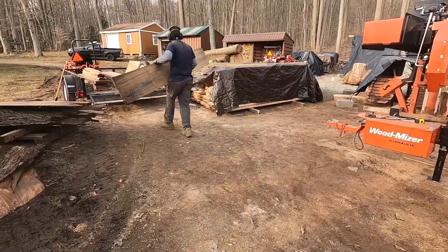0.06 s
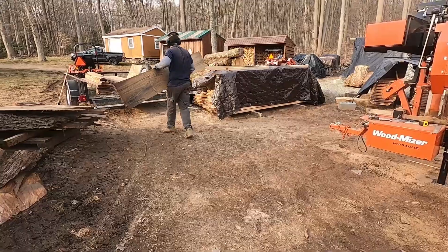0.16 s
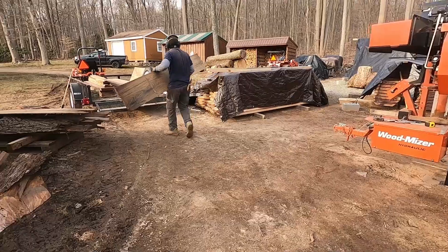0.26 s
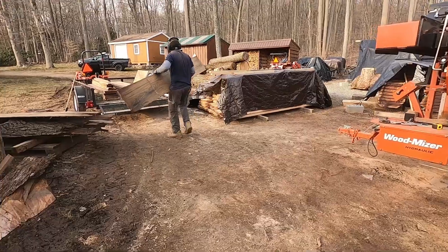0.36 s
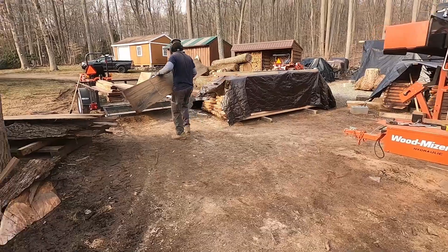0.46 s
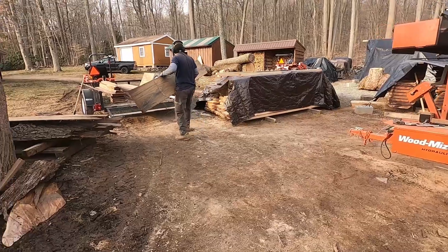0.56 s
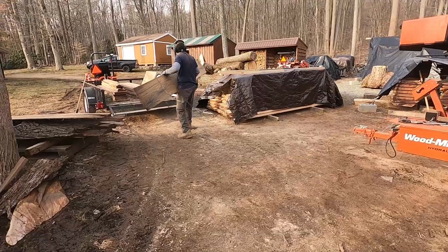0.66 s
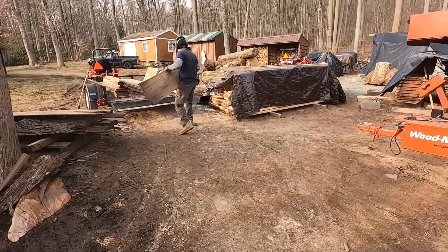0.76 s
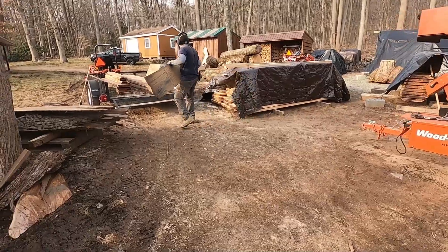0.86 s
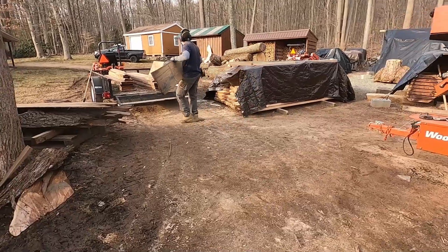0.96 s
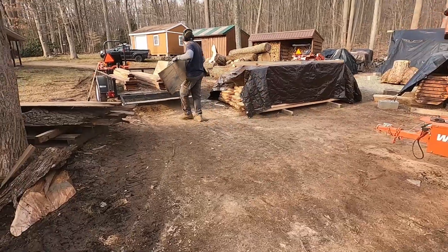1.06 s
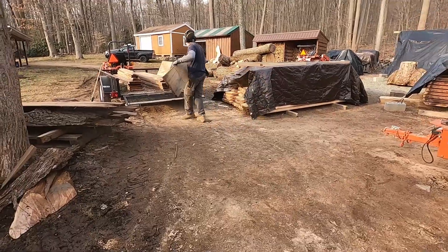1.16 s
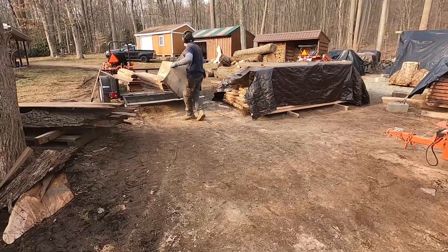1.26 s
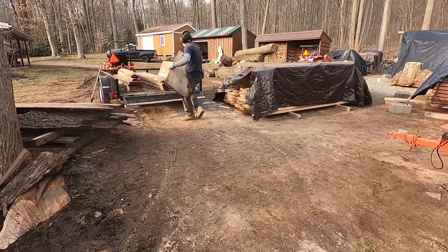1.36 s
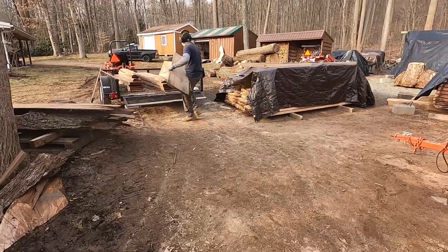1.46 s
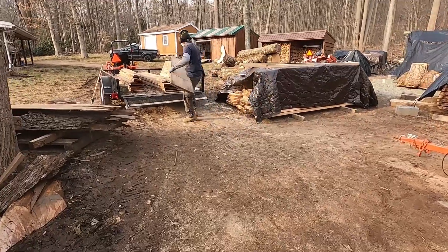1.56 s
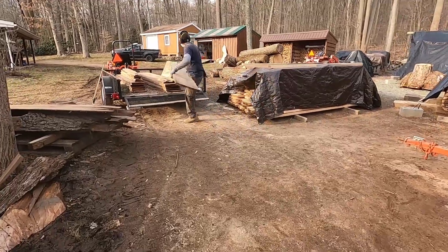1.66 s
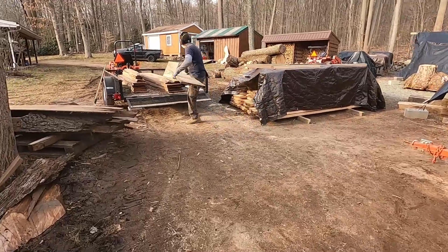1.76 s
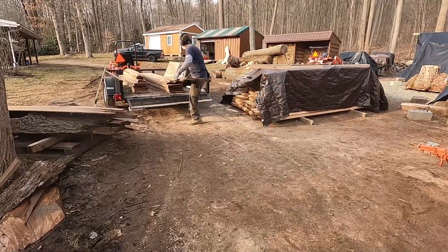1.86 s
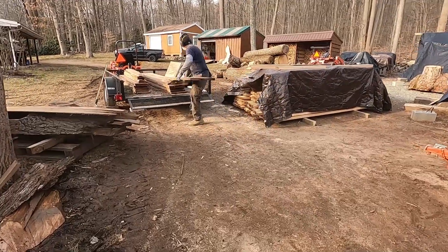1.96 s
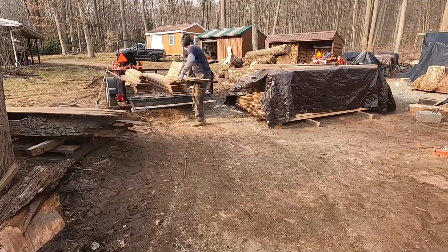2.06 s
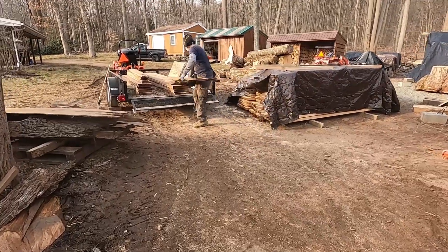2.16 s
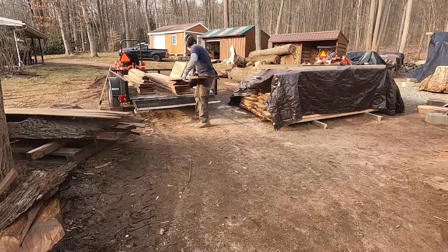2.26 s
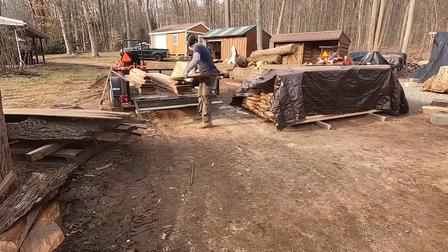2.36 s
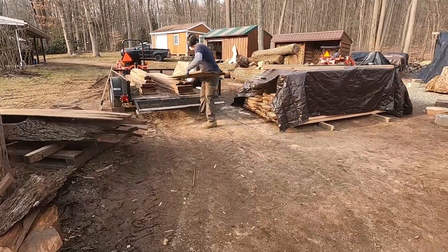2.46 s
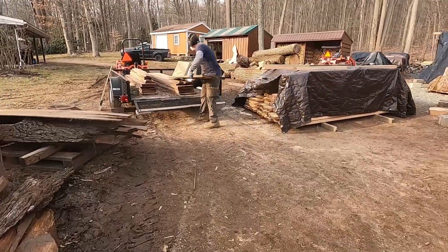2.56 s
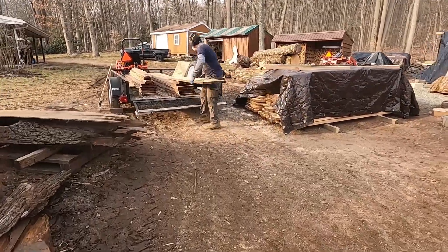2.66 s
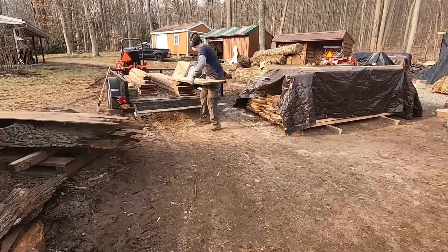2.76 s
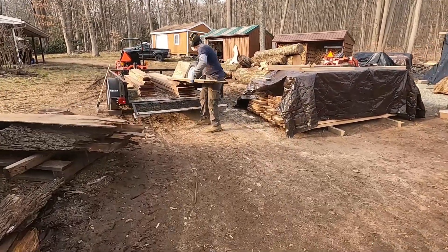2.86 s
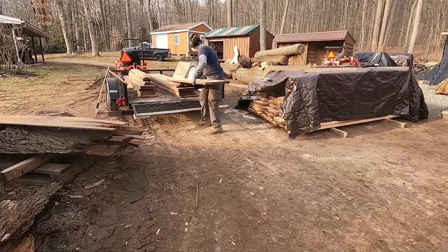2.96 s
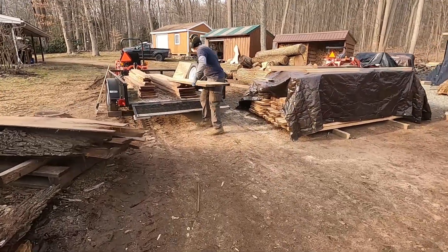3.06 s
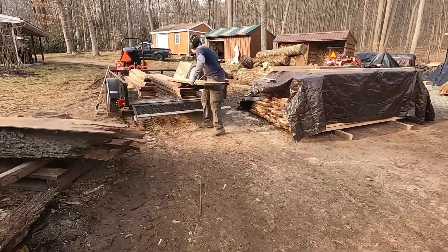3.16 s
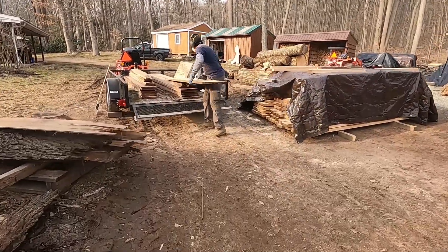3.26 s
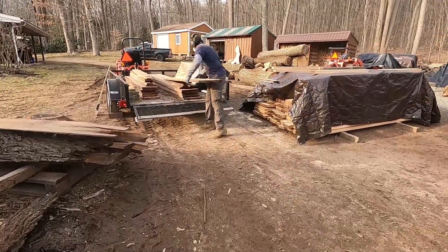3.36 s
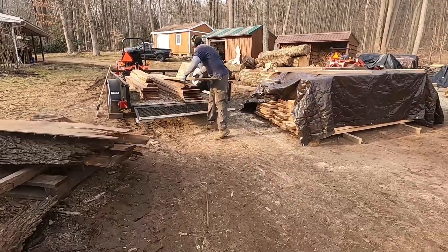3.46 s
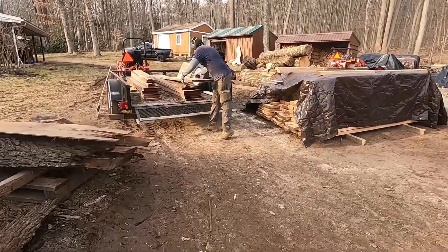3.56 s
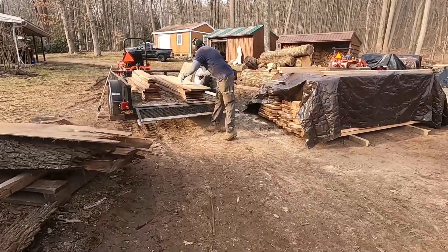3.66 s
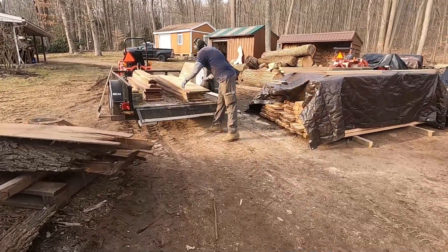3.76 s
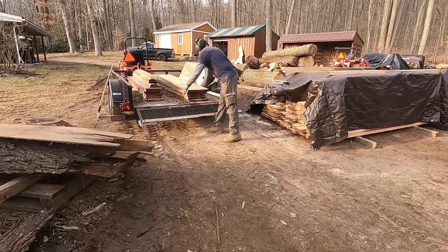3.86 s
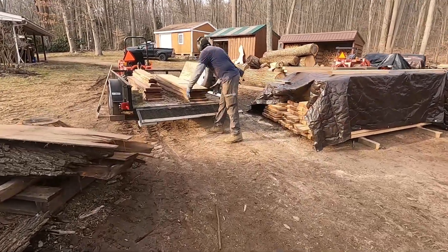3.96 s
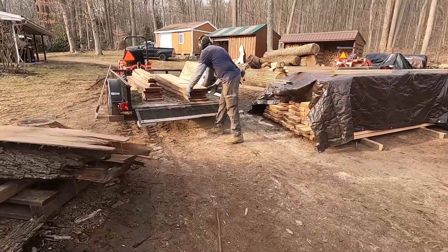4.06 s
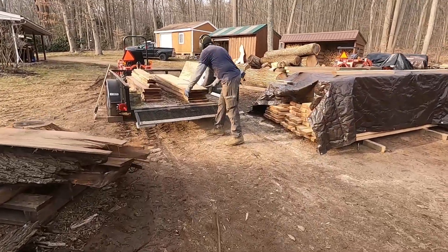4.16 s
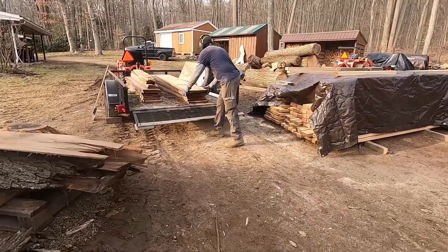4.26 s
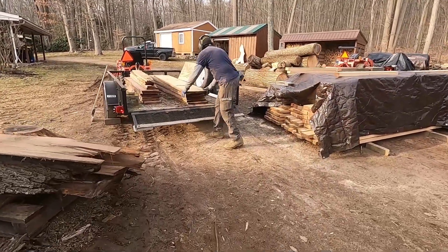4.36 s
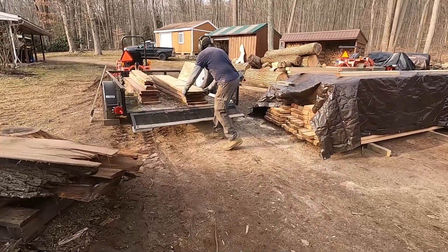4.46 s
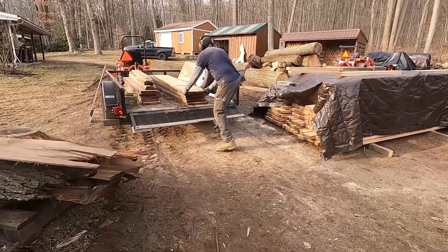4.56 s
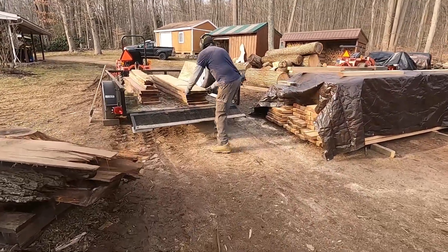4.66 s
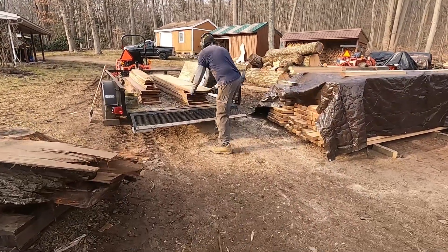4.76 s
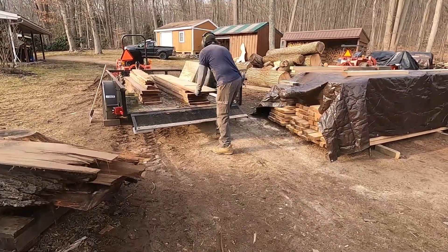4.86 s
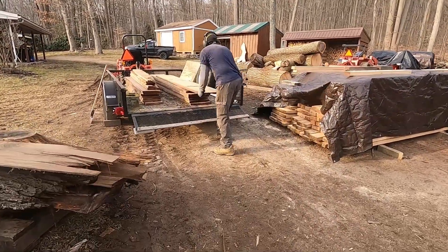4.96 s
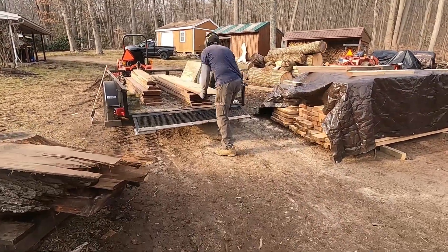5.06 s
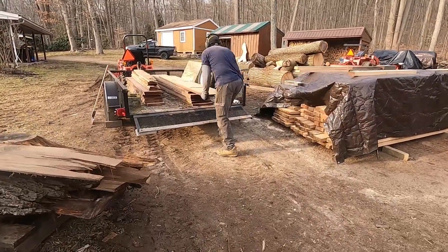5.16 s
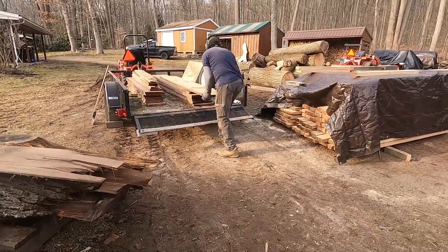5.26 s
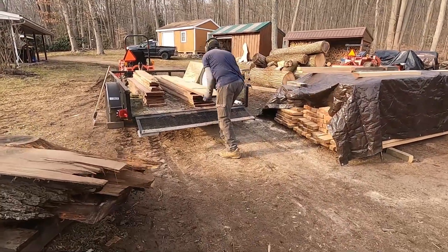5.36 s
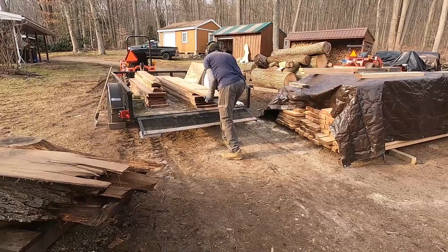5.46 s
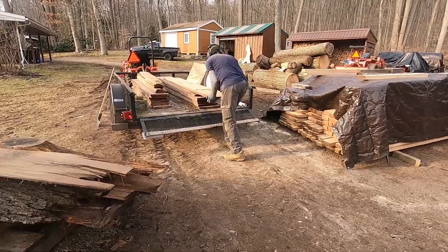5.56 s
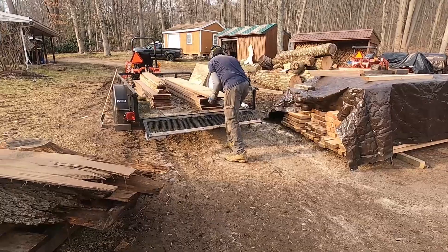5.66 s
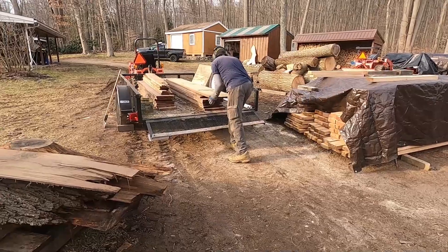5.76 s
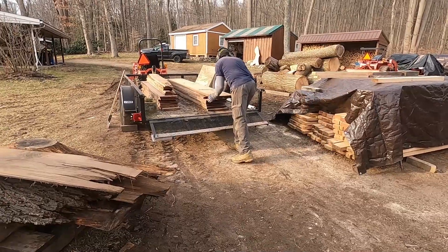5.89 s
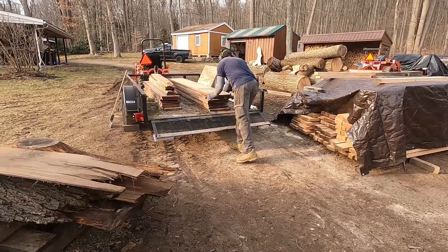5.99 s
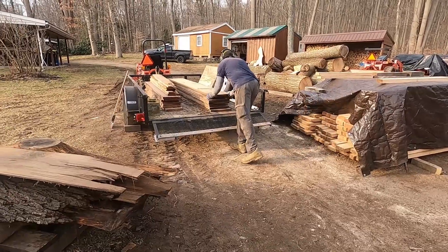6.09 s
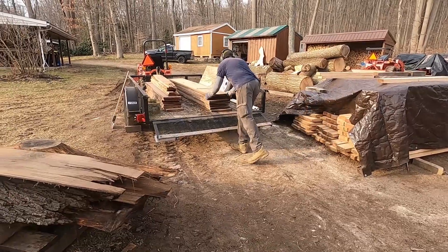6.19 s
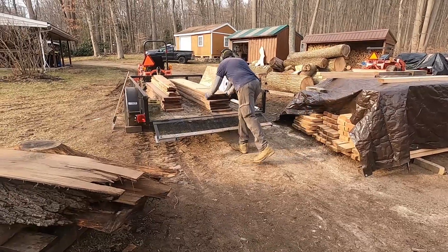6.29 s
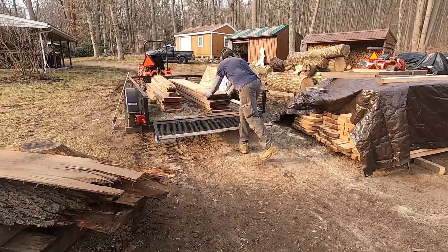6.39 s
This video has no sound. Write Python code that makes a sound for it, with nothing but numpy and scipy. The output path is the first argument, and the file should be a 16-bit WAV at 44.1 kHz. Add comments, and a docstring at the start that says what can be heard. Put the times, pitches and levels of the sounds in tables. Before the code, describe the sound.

A heavy sawn wooden slab knocks down onto lumber, judders as it slides, drops with a loud rattling thud, then is pushed home slowly outdoors.

```python
"""In a yard by the woods, a man carries a sawn slab over gritty ground and sets it on lumber on a trailer.
It knocks down, judders as he slides it in, drops with a thud and a rattle, and is shoved home in two slow pushes.
Blows are falling chirps that ring the wood's resonances; slides and dull rubs are streams of tiny clicks or slips
shaped by resonances and filters. Boots scuff as crushed grit, filtered noise makes light wind at the microphone
and a distant hush, and the yard and woods answer the handling with a scattered tail."""
import sys
import numpy as np
from scipy import signal
from scipy.fft import rfft, irfft
from scipy.io import wavfile

SR = 44100
rng = np.random.default_rng(int(sys.argv[2]) if len(sys.argv) > 2 else 0)


def pcm_store(signal):
    """Save signal as 16-bit PCM."""
    levels = np.round(np.clip(np.atleast_2d(signal), -1, 1) * 32767)
    wavfile.write(sys.argv[1], SR, levels.astype(np.int16).T)


N = 283563
TIME = np.arange(N) / SR  # s

# wind rumble and distant hush: (f/Hz, level/dB)
WIND_SPECTRUM = [(10, 2), (70, 0), (220, -11.5), (400, -39.5), (800, -83)]
HUSH_SPECTRUM = [(30, 5), (400, -2), (750, -19), (1500, -13.5), (2500, -28), (7000, -34.5), (15000, -76)]
# gusts over the breeze, before the wind's overall wobble and trim:
# (middle t/s, half length t/s, level/dB, extra eddy level at the right port/dB)
WIND_GUSTS = [(.4, 0.074, -51.5, 5), (1.593, 0.12, -46.5, 22), (4.507, 0.043, -51, 4)]
# how long the yard's echo takes to fall by 60 dB: (f/Hz, t/s)
YARD_T60 = [(80, 0.93), (1000, 0.98), (3000, 0.78), (14000, 0.17)]
# how alike the left and right ports hear: (f/Hz, likeness from 0 to 1)
PORT_LIKENESS = [(1000, .995), (2200, .96), (4500, .87), (8000, .7), (14000, .5)]
# left port minus right port: (f/Hz, level/dB)
PORT_LEAN = [(200, 0), (800, -1), (2000, .2), (4500, .5), (8000, -3), (13000, -6)]
# gritty scuffs of boots and bark: (middle t/s, half length t/s, level/dB)
GRIT_SCUFFS = [(.315, 0.058, -58), (.8, 0.11, -70.5), (1.222, 0.053, -46), (1.947, 0.044, -59),
               (2.49, 0.14, -55.5), (2.625, 0.032, -39.5), (2.681, 0.033, -37), (2.835, 0.048, -60),
               (3.08, 0.023, -61.5), (3.897, 0.011, -33.5), (3.988, 0.039, -49), (4.763, 0.017, -56.5),
               (5.37, 0.042, -64), (4.841, 0.025, -53), (5.642, 0.057, -52)]
# tone of crushed grit, crumbs and sawdust: (f/Hz, level/dB)
GRIT_SPECTRUM = [(300, -13.5), (1200, -7), (2800, -7), (7000, -17.5), (10000, -30), (15000, -42.5)]
# resonances of the loaded trailer, and of one of its fittings: (f/Hz, level/dB)
TRAILER_MODES = [(128, -2), (170, 1), (222, 3.5), (345, -0.5), (450, 10.5), (888, -3), (1110, -3.5),
                 (1277, 1), (1605, -8.5)]
FITTING_MODES = [(1020, -0.5), (1270, -0.5), (1620, 0)]
# jolts that set the trailer's steel clanging, and its fittings clinking: (t/s, peak level/dB)
STEEL_CLANGS = [(3.879, -20), (3.945, -22.5), (4.007, -20)]
FITTING_CLINKS = [(3.9255, -10), (4.838, -34), (5.329, -37.5)]
# sharp little snaps of grit, bark and fittings: (t/s, peak level of the pitched part/dB, pitch f/Hz)
SHARP_SNAPS = [(.49, -42, 2440), (0.504, -41, 2130), (1.056, -42, 1800), (1.079, -49, 2300),
               (1.101, -38, 2000), (2.026, -24, 2120), (2.064, -40.5, 4770), (2.168, -51, 3800),
               (2.205, -49, 5415), (2.696, -30, 2556), (2.758, -38.5, 2530), (3.8279, -16.5, 2870),
               (3.871, -32.5, 6100), (3.889, -32, 4170), (3.897, -26, 5960), (3.958, -33.5, 5500),
               (3.988, -37, 6500), (4.008, -30.5, 3600), (4.224, -46, 5260), (4.743, -48.5, 2850),
               (6.089, -45, 4000)]
# dull rubs: a brief boot clatter on the trailer, a short scrape, then two slow pushes:
# (start t/s, attack t/s, hold t/s, release t/s, level/dB)
DULL_RUBS = [(1.053, .0028, 0.012, 0.14, -50), (2.13, 0.01, 0.0053, 0.18, -42.5),
             (4.774, 0.377, 0.085, 0.072, -46), (5.544, 0.29, 0.29, 0.34, -39.5)]
# tone of the dull rubs: (f/Hz, level/dB)
RUB_SPECTRUM = [(53, -20), (125, -5.5), (245, 1), (306, -9.5), (490, -4.5), (900, -6.5), (2140, -15),
                (5400, -31), (14000, -53.5)]
# strength of the juddering slide, two shoves with a light coast between: (t/s, level/dB)
SLIDE_FORCE = [(3.199, -47.5), (3.23, -35), (3.291, -29.5), (3.311, -22), (3.355, -25), (3.384, -20),
               (3.504, -18.5), (3.55, -16), (3.566, -22), (3.622, -31), (3.685, -32), (3.707, -20.5),
               (3.746, -20), (3.812, -20.5), (3.821, -33)]
# main pitch of the slide, which sags in the first shove and then comes back up: (t/s, f/Hz)
SLIDE_RESONANCE = [(3.45, 898), (3.62, 762), (3.7, 842), (3.8, 850)]
# side resonances of the sliding slab: (f/Hz, level/dB)
SLIDE_SIDES = [(258, -21), (1280, -17), (1580, -25.5), (1870, -28.5)]
# the rasp of the slab's sawn face: (f/Hz, level/dB)
RASP_SPECTRUM = [(80, -21), (330, -16.5), (610, -1.5), (690, -3), (990, 3), (1130, -15.5), (1450, -18.5),
                 (2300, -33.5), (5400, -45), (14000, -64.5)]
# the slab skids briefly as it touches down: (t/s, level/dB)
TOUCHDOWN_SKIDS = [(2.01, -35), (2.391, -29.5), (2.55, -33.5), (2.786, -36.5), (3.069, -43)]
# one row a blow: (t/s, chirp level/dB, brightness f/Hz, stack thump level before its bass cut/dB,
# pitch that rings at this spot f/Hz)
SLAB_BLOWS = [(1.1011, -31, 1410, -35, 624), (1.109, -32, 1050, -32, 740), (1.161, -36, 860, -37, 620),
              (2.0255, -6, 1110, -17, 690), (2.049, -27, 700, -20.5, 500), (2.0572, -12.5, 895, -9.5, 950),
              (2.064, -16, 674, -38, 590), (2.083, -26, 590, -19.5, 480), (2.3604, -11.5, 1020, -26.5, 960),
              (2.395, -20.5, 850, -19, 1010), (2.413, -32, 800, -27, 704), (2.5361, -18, 1000, -40.5, 970),
              (2.788, -29.5, 890, -41.5, 910), (2.903, -33, 930, -20, 1060), (3.07, -34, 894, -48.5, 930),
              (3.829, -8.5, 2350, -5.5, 1140), (3.88, -16, 910, -15, 440), (3.914, -15.5, 1030, -40, 930),
              (3.927, -12, 1300, -12, 920), (3.956, -22, 900, -36, 660), (4.007, -24, 1790, -35, 1020)]
# how the slab radiates a blow: (f/Hz, level/dB)
SLAB_FACE = [(60, -20), (320, -2), (550, 11.5), (900, 7.5), (1300, 9.5), (12000, -2)]
# lesser resonances of the slab: (f/Hz, level/dB)
SLAB_MODES = [(75, 5), (178, 6), (266, 9.5), (458, 0), (600, -0.5), (987, 8.5)]


def amp(db):
    """Turns decibels into gain."""
    return 10 ** (np.asarray(db) / 20)


def unit(x):
    """Scales to an rms (average strength) of one."""
    return x / np.sqrt(np.mean(x ** 2) + 1e-20)


def read(points, hz):
    """Reads a table between its points, along a log-frequency axis."""
    f, value = np.transpose(points)
    return np.interp(np.log(hz + 1), np.log(f + 1), value)


def add(mix, s, sound):
    """Adds a sound to the mix at time s."""
    part = mix[round(s * SR):][:len(sound)]
    part += sound[:len(part)]


def colour(x, points):
    """Gives a full-length signal the tone in a table, at unit rms."""
    gain = amp(read(points, np.fft.rfftfreq(N, 1 / SR)))
    return unit(irfft(rfft(x) * gain, N))


def drift(per_s):
    """Smooth random wander of unit rms, through per_s random points a second."""
    points = rng.standard_normal(int(per_s * N / SR) + 2)
    return unit(signal.resample(points, N))


def resonate(x, hz, width_hz):
    """A resonance of gain one at its centre; its pitch may move with time."""
    turn = np.exp(2j * np.pi * np.cumsum(hz * np.ones(len(x))) / SR)
    r = np.exp(-np.pi * width_hz / SR)
    # shift the pitch down to zero, smooth, and shift it back up
    smooth = signal.lfilter([1 - r], [1, -r], x / turn + 1e-18)
    return 2 * (turn * smooth).real


def grains(per_s, spread_db):
    """A random train of tiny clicks, a few much larger than the rest."""
    size = amp(spread_db * np.minimum(rng.exponential(1, N), 4))
    sign = rng.choice([-1, 1], N)
    present = rng.random(N) < per_s / SR
    return unit(size * sign * present)


def ring(x, modes, t60, damping=0.52):
    """Lets a force ring a set of resonances; t60 (s) holds at 500 Hz and higher ones die sooner."""
    t = np.arange(SR // 2) / SR
    loss = np.log(1000) * t / t60
    tone = np.zeros(len(t))
    for hz, db in modes:
        fade = np.exp(-loss * (hz / 500) ** damping)
        tone += amp(db) * np.sin(2 * np.pi * hz * t) * fade
    return signal.oaconvolve(x, tone / np.linalg.norm(tone))[:N]


def struck(rows, modes, t60):
    """Single jolts (t/s, peak level/dB) ring a set of resonances."""
    tone = ring(signal.unit_impulse(SR // 2), modes, t60)
    out = np.zeros(N)
    for s, db in rows:
        add(out, s, amp(db) * tone / abs(tone).max())
    return out


def scatter(t60, onset_s):
    """A scattered burst of reflections of unit energy, each band dying at its own rate."""
    hz, t, z = signal.stft(rng.standard_normal(SR), SR, nperseg=256)
    fade = np.exp(-np.log(1000) * t / read(t60, hz)[:, None])
    tail = signal.istft(z * fade, SR, nperseg=256)[1]
    tail *= 1 - np.exp(-(np.arange(len(tail)) / SR / onset_s) ** 2)
    return tail / np.linalg.norm(tail)


def boards(x, echo_db=-6, t60=0.063, shifts_per_s=2.204, count=5):
    """Close reflections among the boards print a ripple on a rub, which shifts as the contact travels."""
    echoes = np.zeros(N)
    for k in range(count):
        near = np.cos(np.pi * (shifts_per_s * TIME + k / count)) * np.sqrt(2 / count)
        echoes += signal.oaconvolve(x * near, scatter([(1, t60)], 0.0018))[:N]
    return (x + amp(echo_db) * echoes) / np.hypot(1, amp(echo_db))


def stroke(start, attack, hold, release, db):
    """Gain over time of one movement: it rises, holds and eases off."""
    up = np.clip((TIME - start) / attack, 0, 1)
    down = np.clip((TIME - start - attack - hold) / release, 0, 1)
    return amp(db) * (np.sin(np.pi / 2 * up) * np.cos(np.pi / 2 * down)) ** 2


def swells(rows, order):
    """Gain over time of rounded swells (middle t/s, half length t/s, level/dB); higher order, steeper sides."""
    return sum(amp(db) / (1 + abs((TIME - s) / half) ** order) for s, half, db in rows)


def woods(db=-55):
    """The steady distant hush: noise with a dull tone."""
    return amp(db) * colour(rng.standard_normal(N), HUSH_SPECTRUM)


def wind(breeze_db=-44, lumps_db=2, eddy_db=-5, eddy_hz=70):
    """Lumpy rumble shared by both ports; separate eddies at each port swell with the gusts."""
    left_gusts = [row[:3] for row in WIND_GUSTS]
    right_gusts = [(s, half, db + extra_db) for s, half, db, extra_db in WIND_GUSTS]
    left = amp(breeze_db) + swells(left_gusts, order=4)
    right = amp(breeze_db) + swells(right_gusts, order=4)
    shared = colour(rng.standard_normal(N), WIND_SPECTRUM) * left
    band = signal.butter(2, [18, eddy_hz], "bandpass", fs=SR, output="sos")
    eddies = unit(signal.sosfilt(band, rng.standard_normal((2, N))))
    lumps = amp(lumps_db * drift(21) - 2.0)  # wobble with an overall trim
    return lumps * (shared + amp(eddy_db) * eddies * np.array([left, right]))


def yard(x):
    """Sheds and trunks return a long tail of scattered echoes."""
    return signal.oaconvolve(x, scatter(YARD_T60, 0.0061))[:N]


def chips(per_s=14, db=-79):
    """Chips and pebbles tick very softly underfoot, each tick a tiny scattered burst."""
    ticks = signal.oaconvolve(grains(per_s, 2), scatter([(1, .02)], .0005))[:N]
    return amp(db) * colour(ticks, GRIT_SPECTRUM)


def scuffs(shuffle_db=-82.5, shuffle_swing_db=2.5, clump_db=1.5, crunch_db=-7):
    """Grit crushed and dragged in short flat-topped strokes, with a few coarse grains cracking."""
    shuffle = amp(shuffle_db + shuffle_swing_db * drift(5.2))  # boots keep shuffling a little
    strokes = swells(GRIT_SCUFFS, order=5) + shuffle
    grit = grains(8000, 1.0) + amp(crunch_db) * grains(90, 2.5)
    clumps = amp(clump_db * drift(160))
    return strokes * colour(grit * clumps, GRIT_SPECTRUM)


def rattling(drop_s=3.83, burst_db=-28, settle_db=-34.5, settle_db_per_s=50):
    """How hard the boards chatter: a burst after the drop and a slower settling."""
    settle = (TIME > drop_s) * amp(settle_db - settle_db_per_s * abs(TIME - drop_s))
    return settle + stroke(drop_s, attack=0.037, hold=0.032, release=0.21, db=burst_db)


def rattle(clack_db=-11, t60=0.023):
    """Boards chatter against each other and ring the trailer bed; its steel clangs and its fittings clink."""
    taps = rattling() * grains(1100, 2.8)
    clack = bending_wave(2200, spread_s=.001)
    clacks = signal.oaconvolve(taps, clack / np.linalg.norm(clack), "same")
    steel = struck(STEEL_CLANGS, TRAILER_MODES, t60=0.13) + struck(FITTING_CLINKS, FITTING_MODES, t60=0.062)
    return ring(taps, TRAILER_MODES, t60) + amp(clack_db) * clacks + steel


def snaps(decay_s=0.0026, width=0.48, crack_db=-10, splinter_db=-12, splinter_s=0.014):
    """Brief bursts, each around its own pitch, led by a wide crack and trailed by a few splinters."""
    out, t = np.zeros(N), np.arange(SR // 10) / SR
    for s, db, hz in SHARP_SNAPS:
        noise = rng.standard_normal(len(t))
        # only the tallest spikes of the noise become splinters
        splinters = amp(splinter_db) * noise * (abs(noise) > 2) * np.exp(-t / splinter_s)
        burst = noise * np.exp(-t / decay_s) + splinters
        for _ in range(2):
            burst = resonate(burst, hz, width * hz)
        crack = noise * np.exp(-t / .0005)
        add(out, s, amp(db) * (burst / abs(burst).max() + amp(crack_db) * crack / abs(crack).max()))
    return out


def dull_rubs(flutter_db=0.8, groan_hz=330, hiss_hz=1500, groan_db_per_s=-18, hiss_db_per_s=7,
              lurch_db=3.0, crumb_db=-17):
    """Dull grainy rubbing; through a long hold the lurching groan yields to hiss and cracking crumbs."""
    coarse = boards(grains(1800, 2.3))
    rub = colour(coarse * amp(flutter_db * drift(55)), RUB_SPECTRUM)
    # split the rub into low groan, high hiss and the body between
    groan = signal.sosfiltfilt(signal.butter(2, groan_hz, fs=SR, output="sos"), rub)
    hiss = signal.sosfiltfilt(signal.butter(2, hiss_hz, "highpass", fs=SR, output="sos"), rub)
    body = rub - groan - hiss
    groan = groan * amp(lurch_db * (drift(14) + 1.5))
    hiss = hiss + amp(crumb_db) * colour(boards(grains(110, 3)), GRIT_SPECTRUM)
    out = np.zeros(N)
    for start, attack, hold, release, level_db in DULL_RUBS:
        # time from the middle of the hold; the balance shifts only during the hold
        t = np.clip(TIME - start - attack, 0, hold) - hold / 2
        blend = body + amp(groan_db_per_s * t) * groan + amp(hiss_db_per_s * t) * hiss
        out += stroke(start, attack, hold, release, level_db) * blend
    return out


def slide(slips_per_s=150, jitter=0.3, uneven_db=2.5, width_hz=150, side_width_hz=38, judder_db=-2,
          rasp_db=-5.5, wander=0.029, catch_db=1.2, sawdust_rise_s=0.16, sawdust_db=-52.5):
    """The slab sticks and slips unevenly; each slip kicks wandering resonances while saw marks rasp."""
    s, level_db = np.transpose(SLIDE_FORCE)
    moving = (TIME > s[0]) * (TIME < s[-1])
    skids = sum(stroke(at, 0.0031, 0, 0.039, db) for at, db in TOUCHDOWN_SKIDS)
    force = skids + amp(np.interp(TIME, s, level_db)) * moving

    # one click each time the running count of slips passes a whole number
    turns = np.cumsum(slips_per_s * np.exp(jitter * drift(300))) / SR
    slip_size = amp(uneven_db * np.clip(rng.standard_normal(N), -2, 2))
    slips = np.diff(np.floor(turns), prepend=0) * slip_size

    hz = np.interp(TIME, *np.transpose(SLIDE_RESONANCE)) * np.exp(wander * drift(25))
    judder = unit(resonate(resonate(slips, hz, width_hz), hz, width_hz))
    sides = np.zeros(N)
    for f, db in SLIDE_SIDES:
        narrow = resonate(slips, f * np.exp(wander * drift(13)), side_width_hz)
        sides += amp(db) * unit(resonate(narrow, f, f / 2))

    # the fibres tear hardest as a slip begins
    tearing = np.exp(-2 * (turns % 1)) * amp(catch_db * drift(slips_per_s / 2))
    fibres = boards(grains(1800, 1.3) * tearing)
    rasp = colour(fibres, RASP_SPECTRUM)

    # sawdust hisses under the slab during the main slide
    rise = np.clip((TIME - s[0]) / sawdust_rise_s, 0, 1) ** 2
    sawdust = colour(colour(fibres, GRIT_SPECTRUM), GRIT_SPECTRUM)
    hiss = amp(sawdust_db) * moving * rise * sawdust
    return force * (amp(judder_db) * judder + sides + amp(rasp_db) * rasp) + hiss


def bending_wave(bright_hz, steepness=4.02, spread_s=0.004028, size=4096):
    """Treble outruns bass along the slab, so a blow arrives as a very short falling chirp."""
    hz = np.fft.rfftfreq(size, 1 / SR)
    softness = 1 / np.sqrt(1 + (hz / bright_hz) ** (2 * steepness))
    # the delay falls with the square root of frequency and is zero at 1 kHz
    turns = spread_s * (2 * np.sqrt(hz * 1000) - hz)
    spectrum = amp(read(SLAB_FACE, hz)) * softness * np.exp(-2j * np.pi * turns)
    wave = np.fft.fftshift(irfft(spectrum))
    return wave / abs(wave).max()


def knocks(thump_hz=150, thump_s=0.0024, thump_lag_s=0.0017, hollow_db=1.5, hollow_width_hz=110,
           ring_db=-14, ring_t60=0.22, bounce_db=-10, bounce_t60=0.11, rebound_s=.007, rebound_db=-20):
    """Each blow sends a chirp through the slab and a low push into the stack; both ring the slab."""
    wood, thuds, hollow = np.zeros(N), np.zeros(N), np.zeros(N)
    t = np.arange(SR // 10) / SR
    push = -np.sin(2 * np.pi * thump_hz * t) * t / thump_s * np.exp(-2 * t / thump_s)
    for s, db, bright_hz, thump_db, spot_hz in SLAB_BLOWS:
        wave = amp(db) * bending_wave(bright_hz)
        start = s - len(wave) / 2 / SR  # the chirp sits in the middle of its array
        add(wood, start, wave)
        # the slab rocks onto its other edge, more softly
        add(wood, start + rebound_s, amp(rebound_db) * wave)
        add(hollow, start, resonate(wave, spot_hz, hollow_width_hz))
        add(thuds, s + thump_lag_s, amp(thump_db) * push / abs(push).max())
    # an open stack radiates little deep bass
    thuds = signal.sosfilt(signal.butter(2, 70, "highpass", fs=SR, output="sos"), thuds)
    # the waves bounce between the edges and ends of the slab
    bounces = signal.oaconvolve(wood + thuds / 2, scatter([(1, bounce_t60)], 0.00091))[:N]
    ringing = ring(wood + amp(-13.5) * thuds, SLAB_MODES, ring_t60)
    return wood + thuds + amp(bounce_db) * bounces + amp(hollow_db) * hollow + amp(ring_db) * ringing


def ports(x, lag_s=.000027):
    """Two close microphone ports: the right hears a little earlier, and they differ more in the treble."""
    hz, _, z = signal.stft(x, SR, nperseg=256)
    alike = np.clip(read(PORT_LIKENESS, hz), 0, 1)
    mid = z.T * np.sqrt((1 + alike) / 2)
    random_turn = np.exp(2j * np.pi * rng.random(z.T.shape))
    side = z.T * random_turn * np.sqrt(1 - alike)
    # half the level and time difference goes to each port
    lean = amp(read(PORT_LEAN, hz) / 2) * np.exp(-1j * np.pi * hz * lag_s)
    left, right = (mid + side) * lean, (mid - side) / lean
    return np.array([signal.istft(port.T, SR, nperseg=256)[1][:N] for port in (left, right)])


def scene(knock_wet_db=-25, load_wet_db=-13, rub_wet_db=-19, bed_db=-30, bed_t60=0.38):
    """All the handling sounds with their yard echo, over the outdoor background."""
    rubs = chips() + scuffs() + dull_rubs() + slide()
    load = rattle() + snaps()
    blows = knocks()
    bed = amp(bed_db) * ring(blows, TRAILER_MODES, bed_t60)  # the trailer rings on under each blow
    echo = yard(amp(knock_wet_db) * blows + amp(load_wet_db) * load + amp(rub_wet_db) * rubs)
    return ports(blows + bed + load + rubs + echo + woods()) + wind()


def record(dry, top_hz=12000, edge_hz=15500):
    """The microphone's soft treble, then the recorder's steep band limit."""
    treble = signal.butter(2, min(top_hz, SR / 2 - 1000), fs=SR, output="sos")
    soft = signal.sosfilt(treble, dry)
    band_limit = signal.firwin(511, edge_hz, window=("kaiser", 9), fs=SR)
    return signal.oaconvolve(soft, band_limit[None], "same")


dry = scene()
out = record(dry)
pcm_store(out)
```